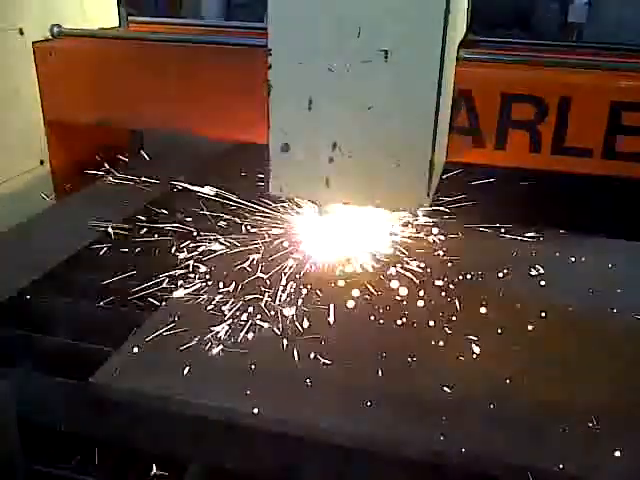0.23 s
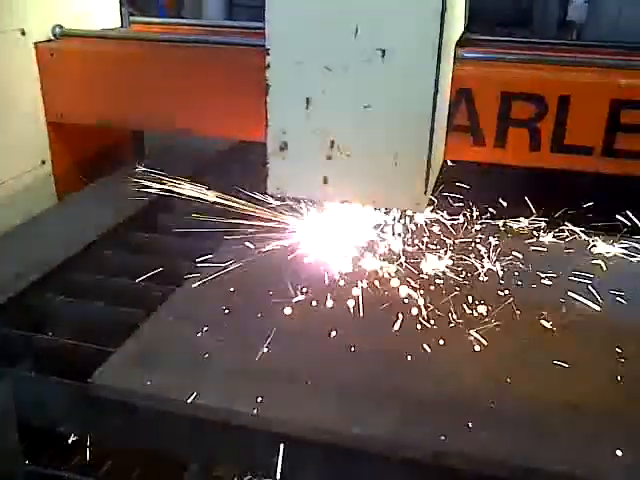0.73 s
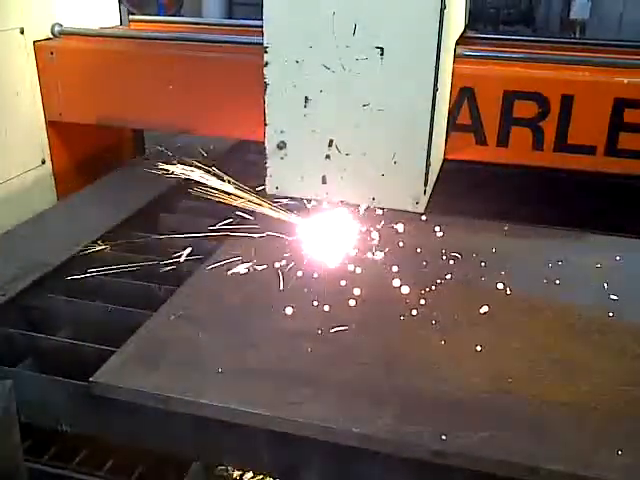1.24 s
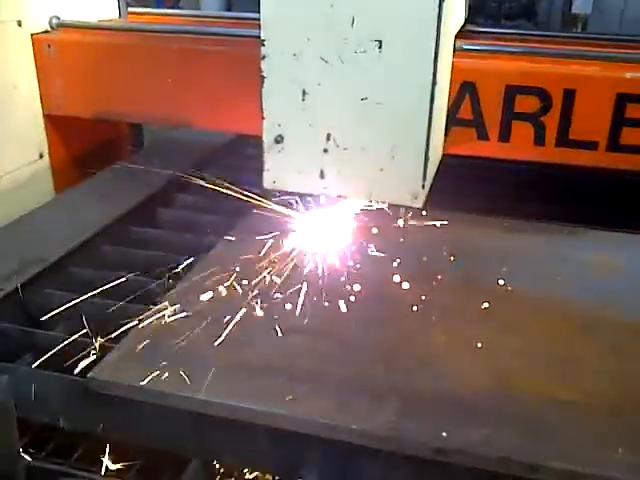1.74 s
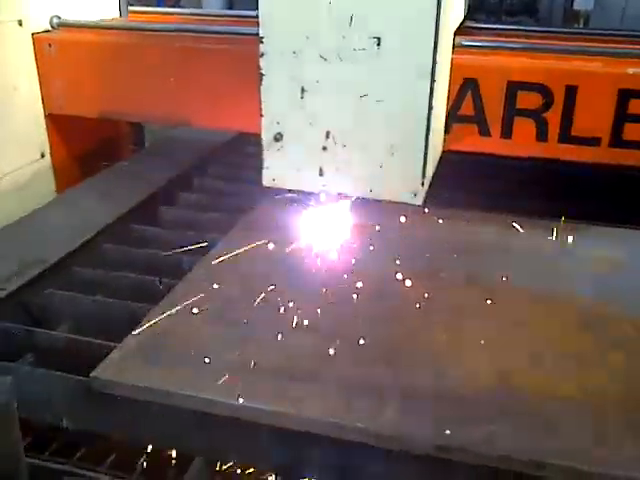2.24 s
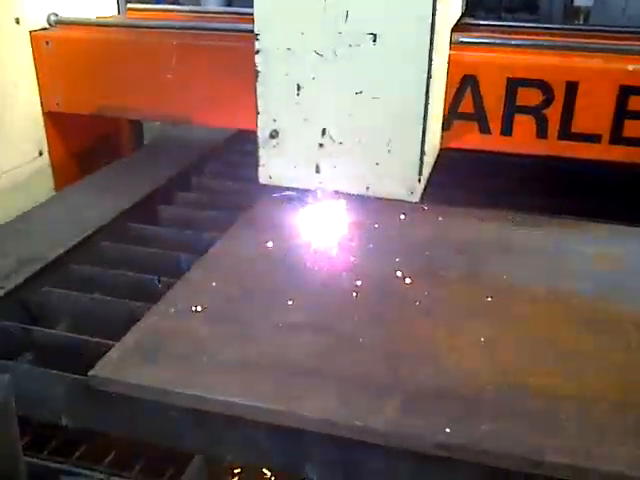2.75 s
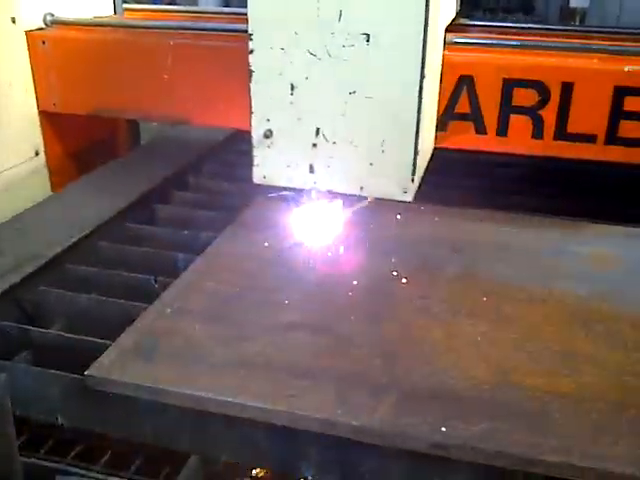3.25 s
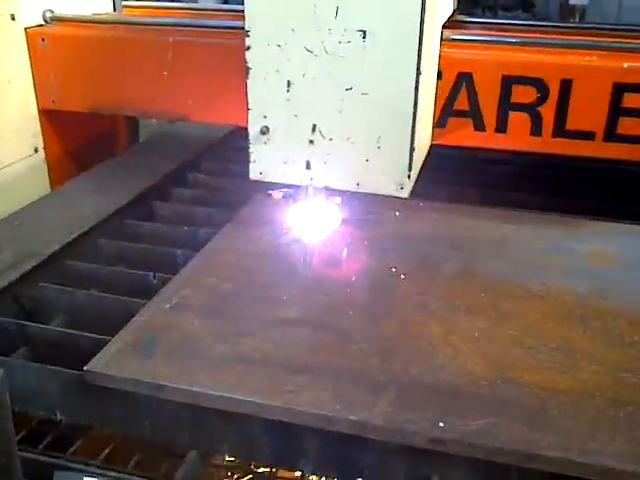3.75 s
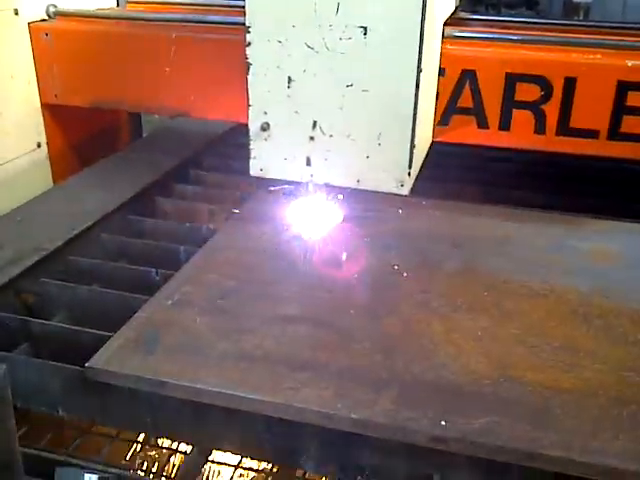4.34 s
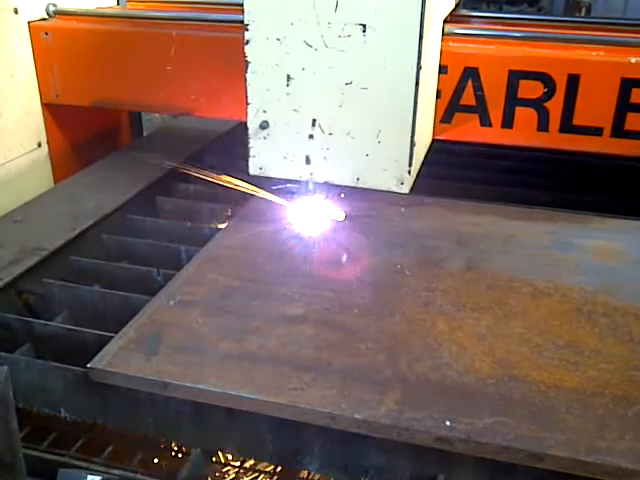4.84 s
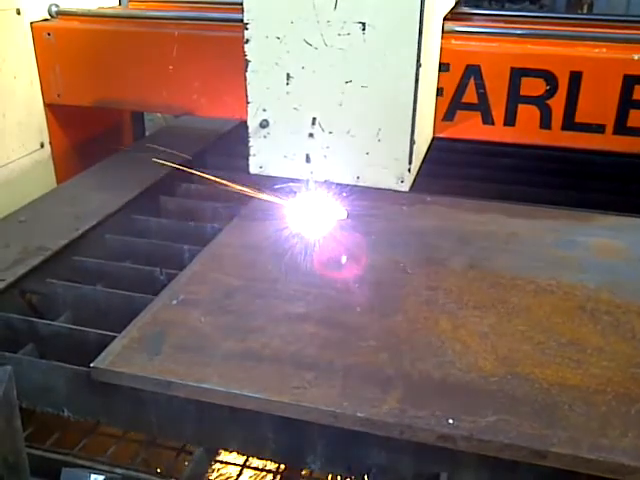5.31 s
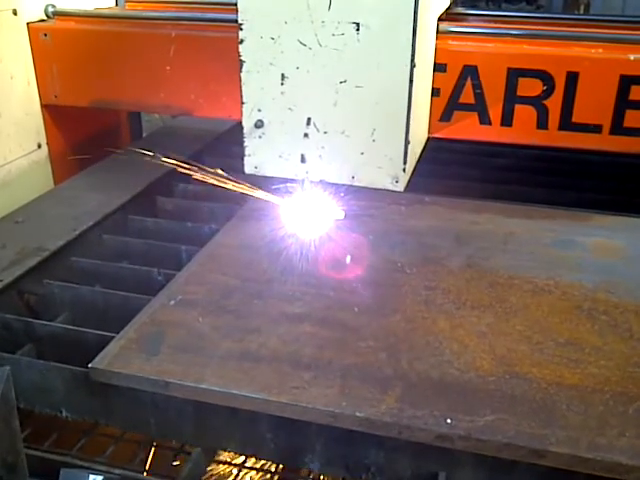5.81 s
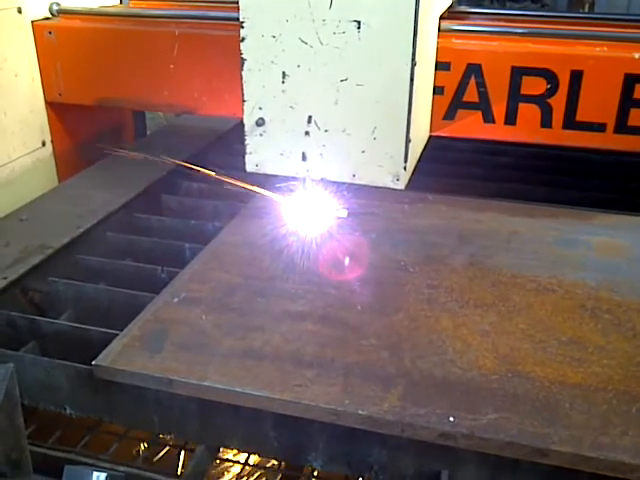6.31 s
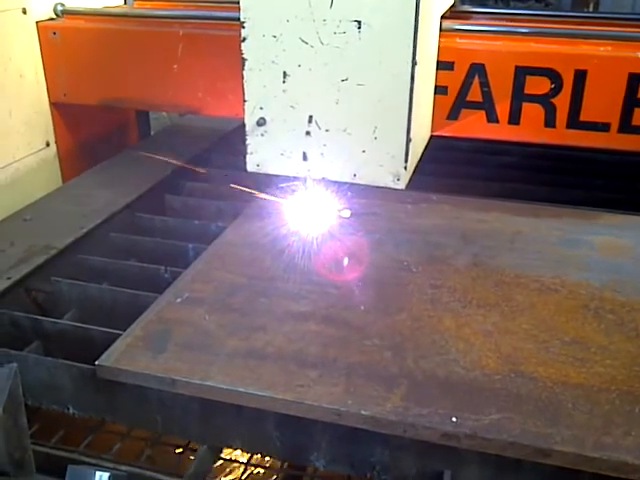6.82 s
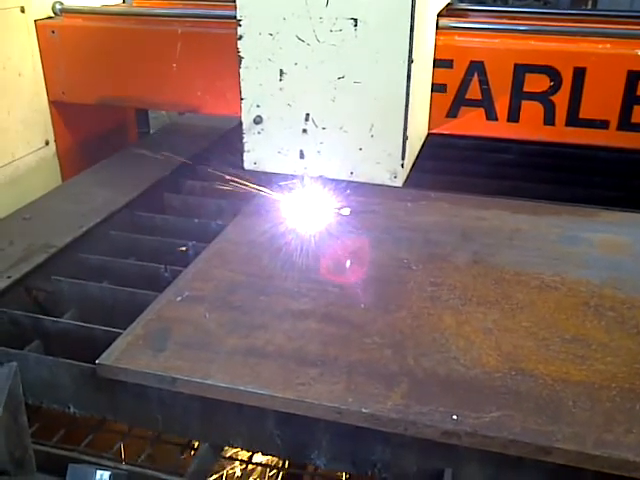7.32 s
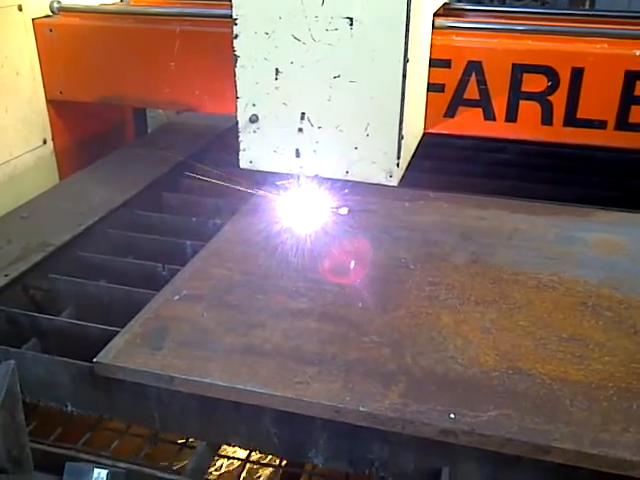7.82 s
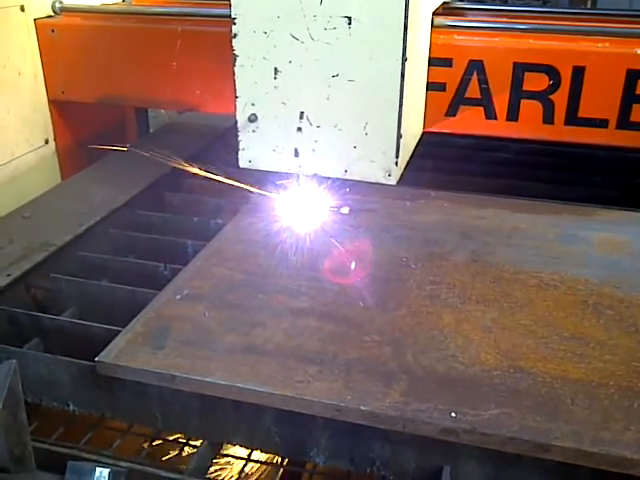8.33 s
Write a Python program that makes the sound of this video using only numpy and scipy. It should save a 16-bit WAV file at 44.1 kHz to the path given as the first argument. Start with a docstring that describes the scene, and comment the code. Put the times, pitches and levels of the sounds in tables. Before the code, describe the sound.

Close to a plasma torch in a workshop, a loud gas hiss and sputtering roar are already going. A short screech and a sharp pop come early, then hollow hoots step upward. At breakthrough the roar drops back and a thin fluttering whistle stands out, soon locking to a steady high pitch as the cutting roar returns. Low machine hum and rumble lie beneath. The sound is centred, mono, slightly dull at the very top.

```python
"""A workshop, close to a plasma torch that pierces a thick steel plate and starts to cut.
Shaped noise makes the gas jet's hiss and its roar, which falls back at breakthrough and returns in the kerf.
Narrow noise makes the howls and the screech of the hole; a fuzzy sine hoots up the crater's resonances.
A nozzle whistle flutters upward, then locks to a nearly steady pitch. One blob of melt pops.
Underneath, hum and a fuzzy drone come from the machine, and lumpy low noise is the shop's rumble."""
import sys
import numpy as np
from scipy import signal
from scipy.fft import rfft, irfft, next_fast_len
from scipy.io import wavfile
from scipy.ndimage import uniform_filter1d

SR = 44100
rng = np.random.default_rng(int(sys.argv[2]) if len(sys.argv) > 2 else 0)


def dump(signal):
    """Clip the signal to [-1, 1] and save it as 16-bit WAV at the path in sys.argv[1]."""
    limited = np.clip(np.atleast_2d(signal).T, -1, 1)
    pcm = np.round(limited * 32767).astype(np.int16)
    wavfile.write(sys.argv[1], SR, pcm)


N = 377496

# how hard the jet strikes steel: start_s, roar level_db before trims, upper roar relative_db
ROAR = [(0.0, -25.5, 5), (0.62, -29, 5), (0.64, -26, 2), (0.83, -24, 3.5), (1.19, -25, 4.5), (1.33, -24, 2),
        (2.07, -24, 2), (2.46, -27.5, 2), (3.53, -34, 4.5), (3.65, -33.5, 5.5), (3.86, -27.5, 3),
        (5.01, -23.5, 0), (5.22, -24, 2), (6.1, -24.5, 2.5), (6.51, -23.5, 2.5), (6.7, -25.5, 3),
        (7.96, -22.5, 1), (8.56, -24, 3)]
# broad colours, each scaled later to its layer's level: pitch_hz, relative level_db
HISS_COLOUR = [(1500, -34), (2500, -21), (3200, -18), (3650, -3), (4100, -2.5), (4380, -13), (4600, -1),
               (4850, -1.5), (5150, -3.5), (5350, -6), (5700, -4.5), (6400, -8.5), (7000, -14), (7700, -38)]
ROAR_COLOUR = [(40, -61.5), (120, -37), (250, -14), (420, -14), (560, -7), (800, -3.5), (1350, -0.5),
               (1600, -2), (1850, -6.5), (2200, -23.5), (3000, -46)]
UPPER_COLOUR = [(1500, -35), (1800, -9.5), (1980, -2), (2250, 0), (2500, -3), (2850, -6), (3100, -8),
                (3500, -10.5), (4300, -11), (6000, -31)]
SHOP_COLOUR = [(12, -25), (25, -13.5), (35, -16), (70, -9.5), (120, 1), (200, 1.5), (300, 3.5), (400, -6.5),
               (800, -11), (2000, -45.5)]
# lift of the top of the hiss: start_s, lift_db
TREBLE = [(0.0, 0), (0.55, 1), (0.68, -3.5), (0.85, -2.5), (1.5, -2.5), (2.2, 1), (2.9, -1), (3.52, -2),
          (3.67, -5.5), (3.79, -1), (5.3, 0), (8.56, 1.5)]
# resonances and notches of the gap under the torch, the crater, the open kerf, and the plate and table
# (the last are there throughout): pitch_hz, width_hz, lift_db
GAP_MODES = [(3430, 110, 2), (3670, 79, -5), (3830, 120, 0.5), (4730, 82, 1), (5000, 80, 2), (5190, 87, 4),
             (5510, 60, -2), (5630, 74, 1.5), (5760, 60, 0), (6350, 60, 4.5), (6820, 150, -4.5)]
CRATER_MODES = [(847, 66, 5), (1050, 33, 4.5), (1394, 90, 4.5), (1655, 70, 3.5), (1900, 50, 1.5),
                (2240, 110, 2), (2385, 52, 3.5), (2740, 62, -2.5), (2940, 110, 2)]
KERF_MODES = [(475, 200, 4), (658, 35, -3), (892, 18, 4), (1029, 32, 12), (1108, 100, 6.5), (1214, 25, 7),
              (1312, 71, 6), (1570, 100, -2.5), (1752, 97, 7.5), (1900, 34, 3), (2170, 59, 3.5),
              (2260, 50, 0), (2375, 60, 3), (2600, 46, 3), (2747, 120, 6), (3170, 64, 4.5)]
TABLE_MODES = [(403, 33, 4.5), (521, 22, 4), (603, 24, 2.5), (755.4, 22, 8.5), (899, 24, 6),
               (1104, 23, 2.5), (1284, 30, 7.5), (1350, 20, 5.5), (1470, 33, 4), (1730, 71, 5)]
# the roar stalls for a moment as melt clogs the crater: middle_s, half_length_s, dip_db
STALLS = [(0.98, 0.04, -1.5), (1.157, 0.015, -5.5), (1.25, 0.017, -3), (2.11, 0.018, -2.5)]
# resonances that stand out as the hole changes shape:
# start_s, length_s, first_pitch_hz, last_pitch_hz, width_hz, level_db
HOWLS = [ (0.0, 0.62, 2290, 2185, 160, -31), (0.649, 0.71, 2570, 2590, 50, -34),
         (1.1, 1.03, 1370, 1384, 40, -31.5), (1.801, 0.55, 2245, 2250, 90, -28.5),
         (3.526, 0.13, 2560, 2220, 200, -28.5), (3.58, 0.2, 2880, 2980, 260, -30),
         (3.659, 0.85, 2412, 2420, 45, -32), (4.168, 0.37, 2430, 2404, 110, -30),
         (4.247, 1.26, 1335, 1396, 50, -33), (4.55, 1.2, 2860, 2820, 70, -33.5),
         (5.104, 0.84, 2298, 2284, 50, -27), (5.4, 2.8, 1487, 1442, 28, -34.5),
         (5.501, 1, 1950, 1930, 60, -31.5), (5.802, 3.4, 2790, 2702, 80, -38.5),
         (5.915, 0.34, 2260, 2263, 70, -28.5)]
# the deepening crater hoots, stepping up its resonances: start_s, pitch_hz, level_db before trim
HOOT = [(0.62, 845, -55), (0.66, 845, -34), (0.8, 840, -31.5), (0.86, 840, -43), (1.13, 845, -42),
        (1.2, 850, -33), (1.69, 862, -29.5), (1.76, 880, -39), (1.81, 915, -31), (1.85, 970, -34),
        (1.87, 995, -25.5), (1.93, 998, -28), (1.96, 1020, -37), (2.01, 1045, -26), (2.09, 1068, -28),
        (2.13, 1130, -42), (2.18, 1280, -34), (2.24, 1325, -31), (2.26, 1425, -29), (2.33, 1435, -50)]
# the jet screeches in the first pit, around the pop: start_s, pitch_hz, level_db
SCREECH = [(0.4, 4720, -43), (0.445, 4810, -23), (0.56, 4840, -25), (0.62, 4950, -24), (0.649, 4830, -17),
           (0.653, 4800, -24), (0.69, 4830, -24), (0.78, 4800, -38)]
# nozzle whistle while piercing, catching and breaking off: start_s, pitch_hz, level_db
PIERCING = [(0.0, 3745, -34), (0.9, 3745, -29.5), (2.24, 3784, -33.5), (2.27, 3830, -25.5),
            (2.33, 3831, -22), (2.345, 3830, -28), (2.365, 3830, -22), (2.41, 3830, -23), (2.43, 3840, -26),
            (2.51, 3855, -21.5), (2.68, 3850, -22), (2.71, 3870, -26), (2.74, 3850, -23),
            (3.05, 3890, -22.5), (3.45, 3910, -20), (3.55, 3920, -21), (3.62, 3916, -19.5),
            (3.86, 3937, -20.5)]
# the same whistle once locked: start_s, level_db before trim
WHISTLE = [(3.86, -20), (4.1, -20), (4.27, -24), (4.52, -20.5), (4.72, -20), (4.75, -25), (5.1, -24.5),
           (5.16, -20.5), (5.24, -24), (5.25, -34), (5.38, -33), (5.42, -26), (5.52, -26), (5.54, -34),
           (5.72, -31), (5.85, -23.5), (6.0, -23.5), (6.09, -28.5), (6.18, -24.5), (6.52, -25.5),
           (6.62, -21.5), (6.74, -20.5), (7.0, -24), (7.4, -26.5), (7.86, -33), (7.95, -27), (8.56, -27.5)]
# pop of molten metal: start_s, level_db before the bass is removed
POPS = [(.647, -13)]
# machine hum: pitch_hz, width_hz, level_db at mid-scene
HUM = [(100.3, 8, -59), (296, 19, -53.5)]
# the motors drone: start_s, level_db before chance swells
DRONE = [(0.1, -47.5), (0.96, -51), (1.61, -45), (2.05, -50), (2.14, -43.5), (2.85, -55), (3.95, -48),
         (7.3, -46.5), (7.84, -37), (7.98, -50.5), (8.45, -48)]
# rumble surges with the first spray of melt and at breakthrough: middle_s, half_length_s, lift_db
SURGES = [(0.344, 0.22, 13.5), (2.423, 0.29, 5)]

# breakthrough; the midpoint of crater becoming kerf, and how long that takes
BREAK_S, KERF_S, OPENING_S = 2.23, 5.9, 0.91
# free hiss at the start; the upper roar that takes half its power; its fall as the hole widens
HISS_DB, HALF_ROAR_DB, HISS_FALL_DB_PER_S = -21, -18, 0.4
# the hiss jumps shortly after breakthrough: when, by how much, how slowly it settles
JUMP_S, JUMP_DB, SETTLE_S = 2.5, 2.1, 1.5
# low lift of the roar: most at KERF_S, rising before and falling after
HOLLOW_DB, DEEPEN_DB_PER_S, THIN_DB_PER_S = 3, 0.48, 1.77
HOWL_FADE = 0.59  # share of a howl spent swelling and fading
# whistle: locked pitch, midpoint of the locking and its length, delay of the echo off the gantry
WHISTLE_HZ, LOCK_S, LOCKING_S, ECHO_S = 3957.5, 3.86, 0.055, 0.009657
# flutter: widest calm swing, most that the ragged hole adds to it, typical rate
CALM_HZ, RAGGED_HZ, FLUTTER_RATE_HZ = 27.7, 30, 22
DRONE_HZ = 239
# rumble at mid-scene before surges, growth of hum and rumble, unevenness of the deepest rumble
RUMBLE_DB, RUMBLE_RISE_DB_PER_S, DEEP_LUMPY_DB = -49.5, 0.5, 4
EDGE_HZ = 7650  # top of the audible band
FRAME, HOP = 4096, 1024  # samples per noise frame, and between frames
TIME = np.arange(N) / SR
FRAME_S = np.arange(N // HOP + 3) * HOP / SR
BIN_HZ = np.fft.rfftfreq(FRAME, 1 / SR)


def jet(flicker_db=0.78, rise_s=0.046, treble_hz=4300, treble_span_hz=2300):
    """High hiss of gas leaving the nozzle: the more of the jet strikes steel and roars, the less it hisses."""
    t = FRAME_S[:, None]
    roar_db, bright_db = follow(ROAR, t)
    age = np.maximum(t - JUMP_S, 0)
    jump_db = JUMP_DB * np.tanh(age / rise_s) * np.exp(-(age / SETTLE_S) ** 2)
    free_db = HISS_DB - HISS_FALL_DB_PER_S * t + jump_db
    level = gain_of(free_db) / np.hypot(1, gain_of(roar_db + bright_db - HALF_ROAR_DB))
    shape = colour(HISS_COLOUR) * gain_of(lift_db(GAP_MODES))
    shape = shape / np.linalg.norm(shape[BIN_HZ > 4400])  # the level counts only the hiss above 4400 Hz
    treble_share = np.clip((BIN_HZ - treble_hz) / treble_span_hz, 0, 1)
    treble = gain_of(follow(TREBLE, t)[0] * treble_share)
    hiss = noise(level * shape * treble * ripple(depth_db=2.5, size=2))
    return hiss * gain_of(flicker_db * wander(60))


def roar(low_db=0.5, upper_db=0.47, sputter_db=0.8, hollow_hz=750, heave_db=0.22):
    """The jet tears at molten steel and sputters; crater resonances give way to those of the kerf."""
    level_db, bright_db = follow(ROAR, FRAME_S[:, None])
    opening, hollow_db = hole(FRAME_S[:, None])
    hole_db = (1 - opening) * lift_db(CRATER_MODES) + opening * lift_db(KERF_MODES)
    low_lift_db = hollow_db / (1 + (BIN_HZ / hollow_hz) ** 6)
    cavity = gain_of(lift_db(TABLE_MODES) + hole_db + low_lift_db) * ripple(depth_db=2.5, size=2)
    low = noise(gain_of(level_db + low_db) * unit_power(cavity * colour(ROAR_COLOUR)))
    upper = noise(gain_of(level_db + bright_db + upper_db) * unit_power(cavity * colour(UPPER_COLOUR)))
    stalled = low * gain_of(bumps_db(STALLS, TIME)) + upper  # only the low part stalls
    return stalled * gain_of(sputter_db * wander(70) + heave_db * wander(3.4))


def hole(t):
    """How far the crater has opened into a kerf (0-1), and how hollow its roar is (dB of low lift)."""
    since = t - KERF_S
    opening = np.clip(.5 + since / OPENING_S, 0, 1)
    return opening, HOLLOW_DB + np.minimum(DEEPEN_DB_PER_S * since, -THIN_DB_PER_S * since)


def whistle(rough_db=1.0, locked_rough_db=0.5, jitter_hz=3.0, locked_db=0.3, breathy=0.38,
            breath_width_hz=380, breath_above_hz=90, echo=0.3, uneven_hz=40, snap=1.41):
    """Over the ragged hole the whistle climbs, swings between two pitches and beats with its echo; then locks."""
    hz, piercing_db = follow(PIERCING, TIME)
    loose = np.clip(.5 - (TIME - LOCK_S) / LOCKING_S, 0, 1)
    # raggedness is zero at breakthrough and at the lock, and greatest midway
    progress = np.clip((TIME - BREAK_S) / (LOCK_S - BREAK_S), 0, 1)
    ragged = np.sqrt(2 * np.sqrt(progress * (1 - progress)))
    # saturation makes the pitch linger at both ends of its swing
    warble = np.tanh(snap * narrow(np.full(N, FLUTTER_RATE_HZ), uneven_hz))
    loose_hz = hz + (CALM_HZ + RAGGED_HZ * ragged) * warble
    locked_hz = WHISTLE_HZ + jitter_hz * wander(35)
    pitch = loose * loose_hz + (1 - loose) * locked_hz
    roughness = gain_of((locked_rough_db + rough_db * loose) * wander(70))
    tone = np.sin(2 * np.pi * np.cumsum(pitch) / SR) * roughness
    tone = evened(tone + echo * ragged * np.interp(TIME - ECHO_S, TIME, tone))
    breath = breathy * ragged * narrow(hz + breath_above_hz, breath_width_hz)
    level_db = loose * piercing_db + (1 - loose) * (follow(WHISTLE, TIME)[0] + locked_db)
    return gain_of(level_db) * (tone + breath)


def cavity_tone(start, length, first_hz, last_hz, width_hz, level_db):
    """One strong resonance of the hole swells, glides as the hole changes shape, and fades."""
    hz = np.linspace(first_hz, last_hz, round(length * SR))
    tone = gain_of(level_db) * narrow(hz, width_hz) * signal.windows.tukey(len(hz), HOWL_FADE)
    return np.pad(tone, (round(start * SR), N))[:N]


def hoot(width_hz=45, fuzz=0.62, trim_db=-1.5):
    """The jet blows across the crater as across a bottle: a tone with turbulent fuzz."""
    hz, level = crater_tone(HOOT)
    tone = np.sin(2 * np.pi * np.cumsum(hz) / SR)
    return gain_of(trim_db) * level * evened(tone + fuzz * narrow(hz, width_hz))


def screech(width_hz=430):
    """A broad resonance of the first pit, blown by the jet's turbulence."""
    hz, level = crater_tone(SCREECH)
    return level * evened(narrow(hz, width_hz))


def crater_tone(rows):
    """Pitch and amplitude of a resonance that sounds only between its first and last row."""
    hz, level_db = follow(rows, TIME)
    return hz, gain_of(level_db) * (TIME > rows[0][0]) * (TIME < rows[-1][0])


def pops(decay_s=0.0024, choke=0.37, choke_s=0.019):
    """A blob of melt bursts and briefly chokes the jet: returns the burst and the flow that is left."""
    bursts, flow = np.zeros(N), np.ones(N)
    for s, db in POPS:
        age = np.maximum(TIME - s, 0)
        bursts += gain_of(db) * (age > 0) * np.exp(-age / decay_s) * wander(1800)
        flow *= 1 - choke * np.tanh(age / decay_s) * np.exp(-(age / choke_s) ** 4)
    no_bass = signal.butter(3, 550, "highpass", fs=SR, output="sos")  # so small a burst radiates no bass
    return signal.sosfilt(no_bass, bursts), flow


def machine(drone_width_hz=9, drone_fuzz=0.55, lumpy_db=2.5, deep_hz=85, swell_db=0.5,
            surge_hz=175, surge_span_hz=90):
    """Power supply and motors hum and drone over the rumble of the shop, which is lumpiest at the bottom."""
    hum = sum(gain_of(db) * narrow(np.full(N, hz), width) for hz, width, db in HUM)
    drone_tone = np.sin(2 * np.pi * DRONE_HZ * TIME)
    drone = evened(drone_tone + drone_fuzz * narrow(np.full(N, DRONE_HZ), drone_width_hz))
    drone_db = follow(DRONE, TIME)[0] + swell_db * wander(2.3)
    surge_band = np.exp(-((BIN_HZ - surge_hz) / surge_span_hz) ** 2)
    shop = colour(SHOP_COLOUR) * gain_of(bumps_db(SURGES, FRAME_S[:, None]) * surge_band)
    deep_share = 1 / (1 + (BIN_HZ / deep_hz) ** 8)
    deep = noise(shop * np.sqrt(deep_share)) * evened(gain_of(DEEP_LUMPY_DB * wander(22)))
    higher = noise(shop * np.sqrt(1 - deep_share))
    rumble = (deep + higher) * gain_of(lumpy_db * wander(14))
    growth = gain_of(RUMBLE_RISE_DB_PER_S * (TIME - TIME.mean()))
    return gain_of(drone_db) * drone + growth * (hum + gain_of(RUMBLE_DB) * rumble)


def noise(gains):
    """Turbulence with the given gains (frames, bins); a total power of one gives an rms of one."""
    z = rng.standard_normal((len(FRAME_S), len(BIN_HZ), 2)) @ [1, 1j]
    _, x = signal.istft((z * gains).T, nperseg=FRAME, noverlap=FRAME - HOP)
    return x[:N] * np.sqrt(3 / 2)  # makes up for the overlap of independent frames


def narrow(hz, width_hz):
    """A resonance blown by turbulence: a fuzzy tone of rms one around the curve hz."""
    turn = np.exp(2j * np.pi * np.cumsum(hz) / SR)
    in_phase = wander(width_hz / 2, size=len(hz))
    quadrature = wander(width_hz / 2, size=len(hz))
    return (turn * (in_phase + 1j * quadrature)).real


def wander(rate_hz, size=N):
    """Smooth chance of rms one, up to about the given rate."""
    length = next_fast_len(size)
    hz = np.fft.rfftfreq(length, 1 / SR)
    spectrum = rfft(rng.standard_normal(N + SR)[:length])
    smooth = irfft(spectrum / np.sqrt(1 + (hz / rate_hz) ** 4), length)
    return evened(smooth[:size])


def ripple(depth_db, size=5, onset_hz=900):
    """Random peaks and dips, as plate and gantry reflect all but the longest waves; they drift with the torch."""
    field = rng.standard_normal((len(FRAME_S), len(BIN_HZ)))
    field = uniform_filter1d(field, size=45, axis=0)  # slow in time
    field = uniform_filter1d(field, size=size, axis=1)  # smooth across pitch
    return evened(gain_of(depth_db * evened(field) * np.tanh(BIN_HZ / onset_hz)))


def colour(points):
    """A spectrum as gains on the bins, with a total power of one."""
    hz, db = np.transpose(points)
    return unit_power(gain_of(np.interp(np.log(BIN_HZ + 1), np.log(hz), db, right=-100)))


def lift_db(modes):
    """Resonance peaks in dB on the bins; one width away from its centre a lift is down to a ninth."""
    return sum(db / (1 + 2 * ((BIN_HZ - hz) / width) ** 2) ** 2 for hz, width, db in modes)


def bumps_db(rows, t):
    """Brief bell-shaped rises or dips of level at the times t."""
    return sum(db * np.exp(-((t - s) / half) ** 2) for s, half, db in rows)


def follow(rows, t):
    """Each column of a curve at the times t."""
    s, *columns = np.transpose(rows)
    return [np.interp(t, s, c) for c in columns]


def gain_of(db):
    """Decibels to amplitude."""
    return 10 ** (np.asarray(db) / 20)


def evened(x):
    """Scales to an rms of one."""
    return x / np.sqrt(np.mean(np.abs(x) ** 2) + 1e-20)


def unit_power(gains):
    """Scales each spectrum to a total power of one."""
    return gains / np.linalg.norm(gains, axis=-1, keepdims=True)


def scene():
    """Torch, pop and machine, the same in both channels; the pop chokes only the torch."""
    bursts, flow = pops()
    howls = sum(cavity_tone(*row) for row in HOWLS)
    torch = jet() + roar() + howls + hoot() + screech() + whistle()
    mono = flow * torch + bursts + machine()
    return np.array([mono, mono])


def record(dry, ceiling=0.68, makeup_db=0.39):
    """The input stage rounds off the highest peaks; then a steep low-pass limits the band."""
    rounded = gain_of(makeup_db) * ceiling * np.tanh(dry / ceiling)
    lowpass = signal.firwin(401, EDGE_HZ, window=("kaiser", 9), fs=SR)
    return signal.oaconvolve(rounded, lowpass[None], "same")


dry = scene()
out = record(dry)
dump(out)
```